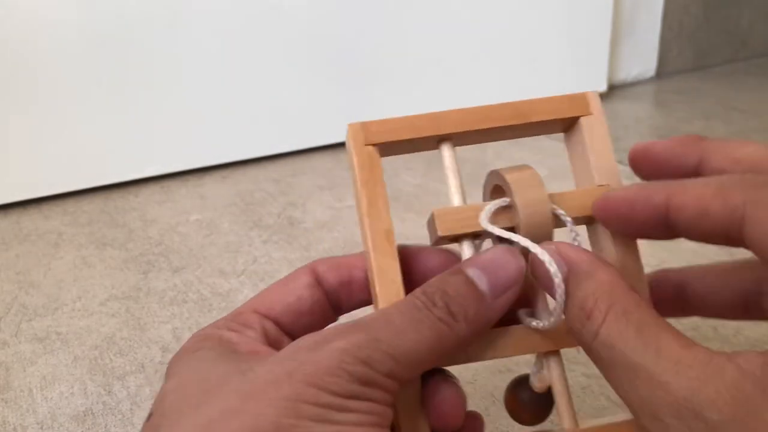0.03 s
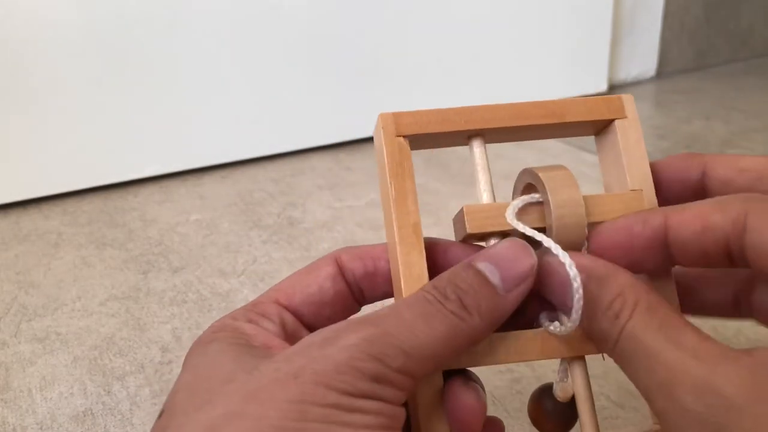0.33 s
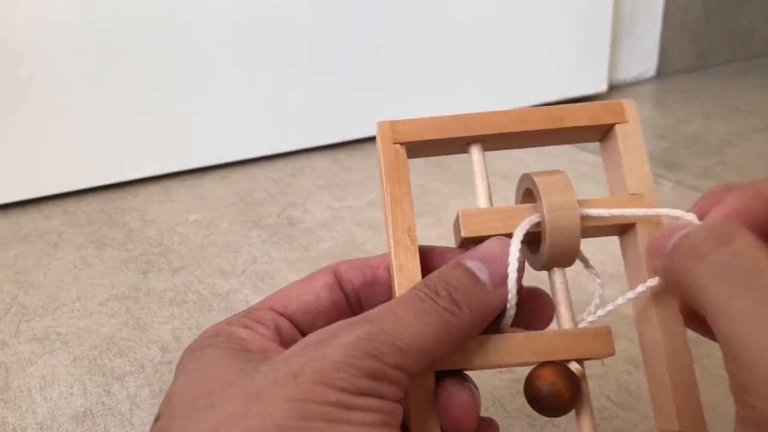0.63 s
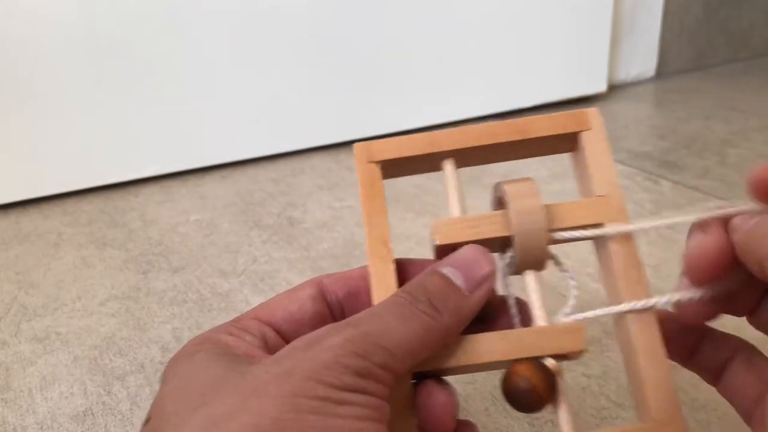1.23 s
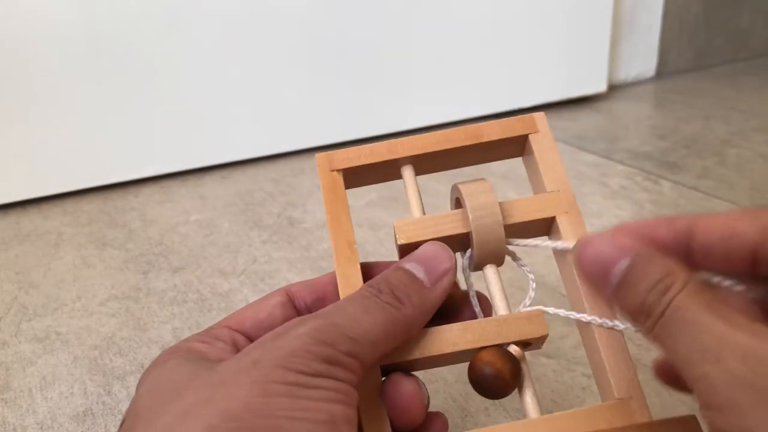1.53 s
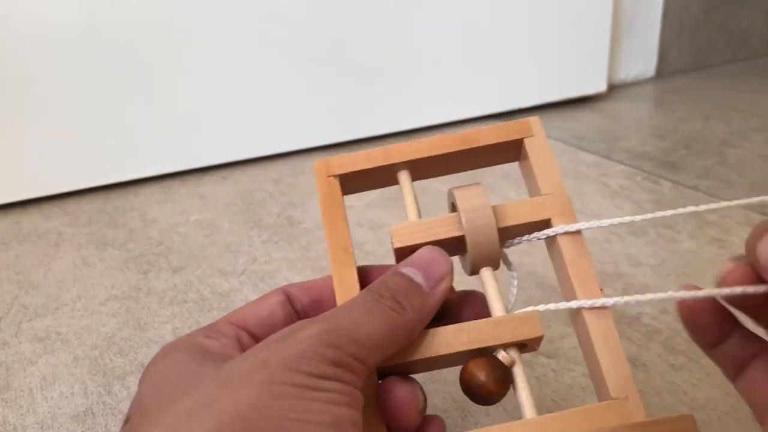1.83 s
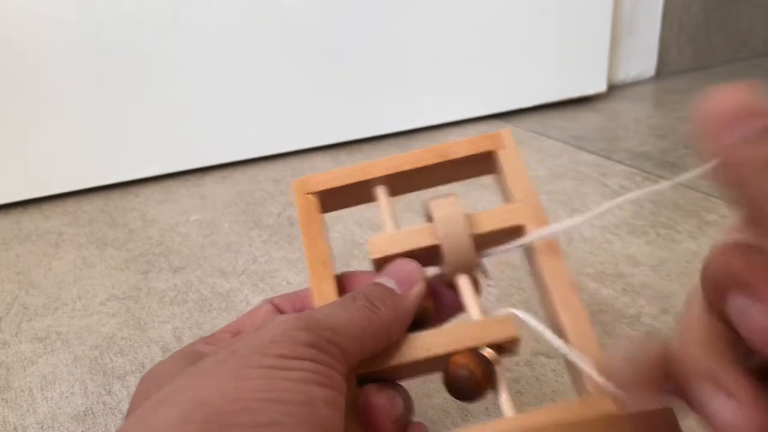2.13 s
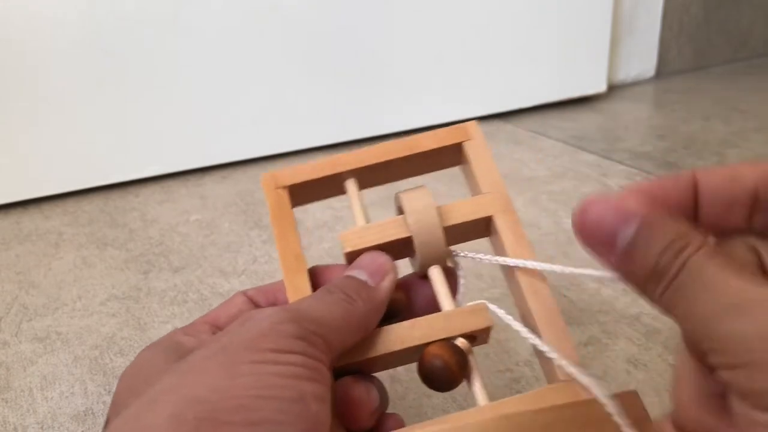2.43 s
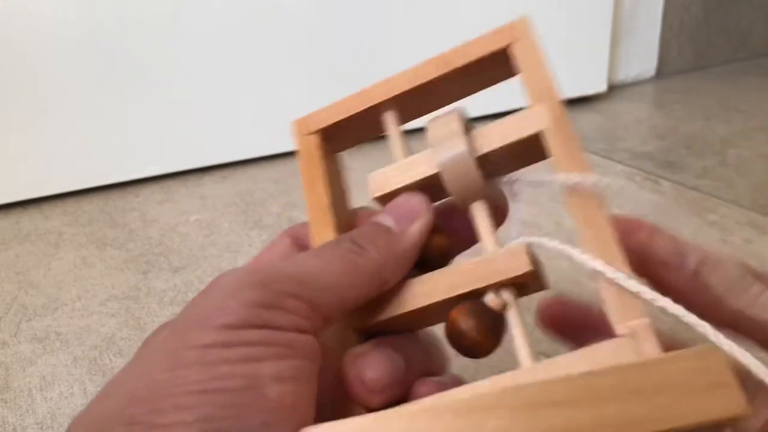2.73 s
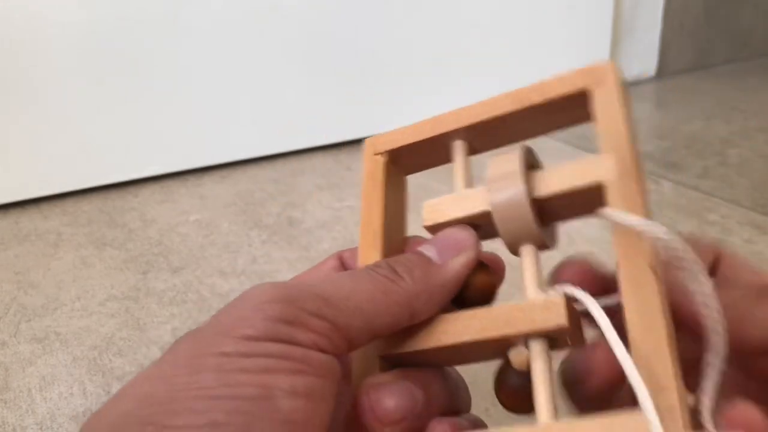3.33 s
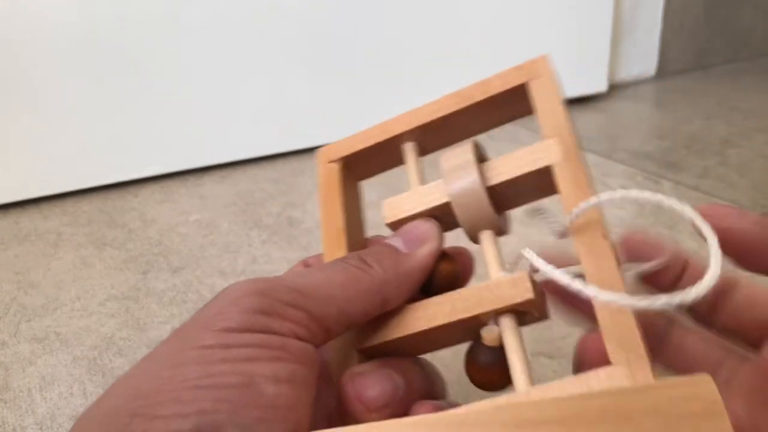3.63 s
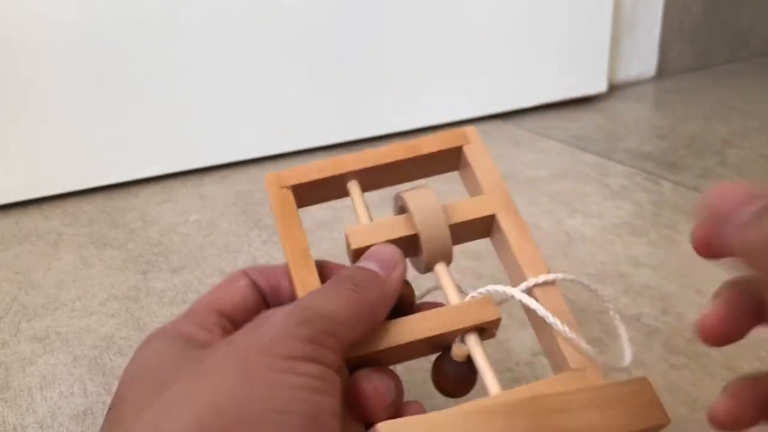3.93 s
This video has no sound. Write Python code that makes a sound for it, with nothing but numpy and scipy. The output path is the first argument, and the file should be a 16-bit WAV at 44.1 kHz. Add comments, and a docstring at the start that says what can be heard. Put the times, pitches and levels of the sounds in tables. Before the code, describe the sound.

A wooden string puzzle is handled close to the microphone in a small quiet room. Beads and a ring click against rods while a cord rustles through in short pulls. The frame knocks now and then, loudest at the end.

```python
"""In a small quiet room, a wooden string puzzle is worked by hand, close by.
A cotton cord rubs through the wood in short rustling pulls and groans once when taut.
Beads and a ring click against the rods, and the frame takes a few hollow knocks.
Under it all lie the dull rumble of the hands, a faint hum and the room's air."""
import sys
import numpy as np
from scipy import signal
from scipy.fft import rfft, irfft
from scipy.io import wavfile

SR = 44100
rng = np.random.default_rng(int(sys.argv[2]) if len(sys.argv) > 2 else 0)


def persist_wave(psi):
    """Save psi, clipped to +-1, as 16-bit WAV."""
    counts = np.round(np.clip(psi, -1, 1) * 32767).astype(np.int16)
    wavfile.write(sys.argv[1], SR, np.atleast_2d(counts).T)


N = 176400
TIME = np.arange(N) / SR
HIT = TIME[:SR // 2]  # the half-second clock of one hit
ATTACK = 176  # samples: a hit's level is set over its first 4 ms
CONTACT_RISE_S, CRACK_FADE_S, HOLLOW_FADE_S = 0.00044, 0.02, 0.022
CUTOFF_HZ = 15850

# the tones the rods ring with: pitch_hz, level_db, fade_s
ROD_TONES = [(2772, 1.5, 0.024), (3120, -7.5, 0.017), (3675, 3, 0.012), (4190, -3, .012),
             (5150, 5.5, 0.0095), (7600, -11.5, 0.013), (8320, -12, 0.024)]
# the tone colour of a sharp crack: pitch_hz, level_db
CRACK_COLOUR = [(1500, -14.5), (4500, -2.5), (6200, -4), (8300, 0), (10000, -10), (16000, -14.5)]
# the tone colour of hollow wood: pitch_hz, level_db
HOLLOW_COLOUR = [(250, -8.5), (550, -15), (900, -4), (1350, -6), (1900, -10.5), (5000, -32)]
# knocks on the frame: start_s, wood_db, crack_db, thump_db, boom_db
FRAME_KNOCKS = [(0.2611, -38.5, -42.5, -49.5, -40), (0.7036, -41.5, -44.5, -46, -47.5),
                (0.7776, -33.5, -39.5, -42.5, -43.5), (.797, -49, -54, -44, -53),
                (2.029, -58.5, -77, -58.5, -56), (2.177, -56, -61, -52, -61), (2.22, -59, -59, -49, -51.5),
                (3.713, -74, -95, -55, -49.5), (3.988, -22.5, -31.5, -33, -48.5)]


def amp(db):
    """Turn decibels into a gain."""
    return 10 ** (np.asarray(db) / 20)


def unit(x, size=None):
    """Scale to an average (rms) level of 1 over the first samples, or over all."""
    return x / np.sqrt(np.mean(x[:size] ** 2) + 1e-20)


def at_hz(points, hz):
    """Read between a table's rows, with octaves evenly spaced."""
    pitches, values = np.transpose(points)
    return np.interp(np.log(np.maximum(hz, 1)), np.log(pitches), values)


def colour(x, points):
    """Turn each pitch of a sound up or down as a table says."""
    hz = np.fft.rfftfreq(len(x), 1 / SR)
    return irfft(rfft(x) * amp(at_hz(points, hz)), len(x))


def noise(points, size):
    """Noise with a given tone colour."""
    return unit(colour(rng.standard_normal(size), points))


def narrow(hz, width_hz, size):
    """Noise around one pitch; around 0 Hz it is a random wobble."""
    distance = 2 * (np.fft.rfftfreq(size, 1 / SR) - hz) / width_hz
    return unit(irfft(rfft(rng.standard_normal(size)) / (1 + distance ** 2), size))


def fade(fade_s):
    """Die away by 60 dB in fade_s seconds."""
    return amp(-60 * HIT / fade_s)


def swell(peak_s, rise_s, fall_s):
    """A rounded rise and fall around a moment."""
    return np.exp(-((TIME - peak_s) / np.where(TIME < peak_s, rise_s, fall_s)) ** 2)


def build_up(rise_s):
    """Wood gives a little, so a blow takes a moment to build."""
    return 1 - np.exp(-HIT / rise_s)


def struck(tones, tuning=1):
    """A struck object rings with fading tones, their strengths new at every blow."""
    out = np.zeros(len(HIT))
    for k, (hz, db, fade_s) in enumerate(tones):
        strength = (-1) ** k * amp(db + 2.5 * rng.uniform(-1, 1))
        out += strength * np.sin(2 * np.pi * hz * tuning * HIT) * fade(fade_s)
    return out


def burst(points, fade_s):
    """The short noisy part of a hit."""
    return unit(noise(points, len(HIT)) * fade(fade_s), ATTACK)


def add(out, start_s, x):
    """Mix a sound in at a given time."""
    i = int(np.clip(start_s * SR, 0, N - 1))
    out[i:i + len(x)] += x[:N - i]


def background():
    """Hands rumble on the frame, over a wavering hum and the room's air."""
    # how loud the hands are: time_s, level_db
    hand_levels = [(0, -49), (.2, -56.5), (.68, -57.5), (.84, -46.5), (1.0, -57.5), (1.9, -61.5),
                   (2.12, -64), (2.25, -53.5), (2.45, -63), (4.0, -64.5)]
    # the tone colour of the hands: pitch_hz, level_db
    rumble_colour = [(35, -17.5), (65, -0.5), (145, 0.5), (300, -4.5), (1500, -44)]
    # the tone colour of the air: pitch_hz, level_db
    air_colour = [(18, -55), (30, 1.5), (149, -17.5), (616, -11), (16000, -25.5)]
    rumble = amp(np.interp(TIME, *np.transpose(hand_levels))) * noise(rumble_colour, N)
    hum = amp(-64) * narrow(hz=151.4, width_hz=15.3, size=N)
    return rumble + hum + amp(-71.5) * noise(air_colour, N)


def friction():
    """Fibres make tiny slips over a smooth rub, catching and letting go."""
    slips_per_s, spread_db, catch_db, catch_hz = 1500, 4.5, 2.5, 70
    slipping = rng.random(N) < slips_per_s / SR
    strength = amp(spread_db * np.minimum(rng.exponential(1, N), 4))
    slips = unit(slipping * strength * rng.choice([-1, 1], N))
    smooth = 0.64 * rng.standard_normal(N)
    return unit((slips + smooth) * amp(catch_db * narrow(0, 2 * catch_hz, N)))


def cord_turning(x):
    """Narrow bands of pitch swell and sink on their own as the twisted cord turns over the wood."""
    drift_hz, swing_db = 14, 2.6
    edges_hz = np.geomspace(1500, 17000, 25)
    band = np.digitize(np.fft.rfftfreq(N, 1 / SR), edges_hz)
    steps_s = np.linspace(0, N / SR, int(2 * drift_hz * N / SR))
    spectrum, out = rfft(x), np.zeros(N)
    for k in range(len(edges_hz)):
        drift = np.interp(TIME, steps_s, rng.standard_normal(len(steps_s)))
        out += irfft(spectrum * (band == k), N) * amp(swing_db * drift)
    return out


def cord_pulls():
    """Each pull hisses, rubs the rods and the frame into sound, and now and then rasps."""
    # pulls of the cord: peak_s, rise_s, fall_s, hiss_db, rods_db, hollow_db
    pulls = [(0.171, .15, 0.013, -73, -64.5, -65), (.46, 0.032, 0.074, -70, -68.5, -74),
             (0.578, 0.042, 0.027, -62.5, -62, -62), (.768, 0.064, 0.032, -63, -59.5, -57),
             (.86, 0.066, 0.39, -69.5, -73.5, -71), (1.127, 0.024, 0.053, -56.5, -62, -72.5),
             (1.245, 0.008, 0.025, -55, -54, -61.5), (1.386, 0.039, 0.022, -62.5, -66.5, -71.5),
             (1.785, 0.11, 0.032, -60.5, -69, -68.5), (2.03, 0.08, 0.068, -64, -66.5, -66),
             (2.201, 0.036, 0.1, -63, -63.5, -63.5), (2.598, 0.02, 0.0043, -55, -60, -62),
             (2.765, 0.075, 0.043, -61, -65.5, -76), (3.315, 0.036, 0.031, -58.5, -60, -61.5),
             (3.403, 0.046, 0.059, -60, -59.5, -68), (3.633, 0.019, 0.034, -64, -71, -78)]
    # the tone colour of the fibres' hiss: pitch_hz, level_db
    fibre_colour = [(1500, -19), (5000, -2), (6300, 2.5), (8400, 2), (10000, -3), (16000, -8)]
    # the rub catches and rasps; in the row at 3.9 s the cord slides with a smooth high hiss:
    # peak_s, half_length_s, pitch_hz, level_db, width (share of the pitch)
    catches = [(0.768, 0.015, 5430, -51, .06), (1.141, 0.034, 8450, -55.5, .1),
               (1.243, 0.021, 8650, -54.5, .06), (1.247, .008, 2760, -48, 0.036),
               (3.317, 0.0046, 4310, -49, 0.11), (3.315, 0.014, 1850, -49, .5),
               (3.312, 0.019, 7750, -56.5, 0.12), (3.9, 0.085, 9300, -66, 0.85)]
    rough_db, rough_hz = 3, 300
    power = sum(np.outer(amp(levels_db), swell(peak_s, rise_s, fall_s)) ** 2
                for peak_s, rise_s, fall_s, *levels_db in pulls)
    hiss_gain, rods_gain, hollow_gain = np.sqrt(power)
    rub = friction()
    rasps = sum(amp(db) * swell(peak_s, half_s, half_s) * narrow(hz, width * hz, N)
                for peak_s, half_s, hz, db, width in catches)
    roughness = unit(amp(rough_db * narrow(0, 2 * rough_hz, N)))
    hiss = hiss_gain * unit(colour(rub, fibre_colour))
    rods = rods_gain * unit(signal.fftconvolve(rub, struck(ROD_TONES))[:N])
    rustle = cord_turning(hiss + rods)
    hollow = hollow_gain * unit(colour(friction(), HOLLOW_COLOUR))
    return rustle + hollow + roughness * rasps


def rod_tap():
    """The rods ring a little higher or lower with every change of grip."""
    return unit(struck(ROD_TONES, tuning=1 + 0.05 * rng.uniform(-1, 1)), ATTACK)


def clicks():
    """A bead or the ring hits the rods: both ring, with a crack and a light clack of the frame."""
    # the hits: start_s, piece_db, pitch_hz, rods_db, clack_db, crack_db
    hits = [(0.1957, -56, 2420, -54, -52, -50.5), (0.5595, -47, 4400, -51, -54, -49.5),
            (0.591, -40.5, 4800, -45.5, -36.5, -45), (0.6038, -42, 4460, -47, -41, -60),
            (1.1448, -52, 8250, -55, -60, -45.5), (1.2214, -52, 5510, -58, -56.5, -50),
            (1.514, -72, 2820, -75, -64, -55.5), (1.6509, -65, 5200, -64, -63, -52),
            (1.696, -42, 2910, -44.5, -68, -43.5), (1.758, -54, 5120, -50.5, -66, -45),
            (1.7898, -48, 2660, -47.5, -46.5, -44), (2.002, -38, 2800, -36, -68, -37),
            (2.518, -38, 4310, -53.5, -53.5, -41), (2.706, -57, 4960, -58, -61, -53.5),
            (2.7718, -56, 4930, -59, -50, -49), (2.9128, -36.5, 3193, -42.5, -45.5, -41),
            (3.057, -58.5, 3850, -59.5, -70, -53.5), (3.3593, -50, 2900, -54, -70, -45),
            (3.4028, -54, 5320, -55, -48, -45.5)]
    # a loose piece shivers on after its click: start_s, pitch_hz, level_db
    shivers = [(.604, 4300, -56.5), (0.605, 7840, -61), (.604, 1450, -58.5), (2.915, 3210, -52.5),
               (2.913, 5330, -56), (2.912, 7400, -58)]
    piece_fade_s = 0.02
    out = np.zeros(N)
    cut_bass = signal.butter(2, 1110, "high", fs=SR, output="sos")
    for start_s, piece_db, hz, rods_db, clack_db, crack_db in hits:
        piece_tones = [(hz, 0, piece_fade_s), (0.86 * hz, -3.5, piece_fade_s / 2)]
        piece = amp(piece_db) * unit(struck(piece_tones), ATTACK)
        hollow = burst(HOLLOW_COLOUR, HOLLOW_FADE_S)
        clack = amp(clack_db) * unit(signal.sosfilt(cut_bass, hollow), ATTACK)
        rods = amp(rods_db) * rod_tap()
        crack = amp(crack_db) * burst(CRACK_COLOUR, CRACK_FADE_S)
        add(out, start_s, build_up(CONTACT_RISE_S) * (piece + rods + crack + clack))
    for start_s, hz, db in shivers:
        shiver = narrow(hz, 0.1 * hz, len(HIT)) * fade(0.17)
        add(out, start_s, amp(db) * unit(shiver, size=1300))
    return out


def touches():
    """Pieces graze the rods just before a knock, and tick faintly as the hands shift."""
    ticks_per_s = 5
    graze = sum(amp(min(-46.5, wood_db - 15.5)) * swell(knock_s, 0.0072, CONTACT_RISE_S)
                for knock_s, wood_db, *_ in FRAME_KNOCKS)
    out = graze * unit(signal.fftconvolve(friction(), struck(ROD_TONES))[:N])
    for when, softness in rng.random((int(ticks_per_s * N / SR), 2)):
        tick = rod_tap() + burst(CRACK_COLOUR, CRACK_FADE_S) / 2
        add(out, when * N / SR, amp(-64 - 10 * softness) * build_up(CONTACT_RISE_S) * tick)
    return out


def knocks():
    """The frame gives a dull crack, brighter when hit harder; a low thump and boom build up after it."""
    # the frame's own tones: pitch_hz, level_db, fade_s
    frame_tones = [(732, -7.5, 0.059), (906, 2.5, 0.019), (1019, 4.5, 0.02), (1218, -2.5, 0.029),
                   (1387, -1, 0.024)]
    # the low tones a knock wakes: pitch_hz, level_db, fade_s
    thump_tones = [(265.5, -4.5, 0.18), (295.9, 3, 0.29), (333.3, -7.5, 0.51), (392, -11, 0.48),
                   (439.5, -5.5, 0.18), (490, 2.5, 0.047)]
    # the deepest tones: pitch_hz, level_db, fade_s
    boom_tones = [(130, 5.5, .15), (144.6, 5, 0.27), (179.6, -8.5, 0.44)]
    out = np.zeros(N)
    usual_db = np.median([wood_db for _, wood_db, *_ in FRAME_KNOCKS])
    for start_s, wood_db, crack_db, thump_db, boom_db in FRAME_KNOCKS:
        octaves_up = max(wood_db - usual_db, 0) / 14
        cut_treble = signal.butter(2, min(7500 * 2 ** octaves_up, CUTOFF_HZ), fs=SR, output="sos")
        wood = unit(struck(frame_tones), ATTACK) + burst(HOLLOW_COLOUR, HOLLOW_FADE_S) / 2
        crack = rod_tap() + amp(-3.5) * burst(CRACK_COLOUR, CRACK_FADE_S)
        blow = signal.sosfilt(cut_treble, amp(wood_db) * wood + amp(crack_db) * crack)
        thump = amp(thump_db) * unit(struck(thump_tones) * build_up(0.0012), size=1300)
        boom = amp(boom_db) * unit(struck(boom_tones) * build_up(0.0073), size=2200)
        add(out, start_s, build_up(CONTACT_RISE_S) * blow + thump + boom)
    return out


def cord_groan():
    """The taut cord sticks and slips at a low, wavering pitch."""
    # the one groan: peak_s, rise_s, fall_s, pitch_hz, level_db
    groan = (1.378, .032, .048, 288, -48)
    peak_s, rise_s, fall_s, hz, db = groan
    wavering_hz = hz * (1 + 0.025 * narrow(0, 83, N))
    phase = 2 * np.pi * np.cumsum(wavering_hz) / SR
    tone = np.sqrt(2) * (np.sin(phase) + amp(-27) * np.sin(2 * phase))
    return amp(db) * swell(peak_s, rise_s, fall_s) * tone


def room(x):
    """The walls send back a blur of echoes whose treble dies first."""
    # how long the echoes last: pitch_hz, fade_s
    echo_fades = [(300, 0.68), (2000, 0.51)]
    # their tone colour: pitch_hz, level_db
    echo_colour = [(150, -3.5), (400, 3), (3000, -5), (15000, -3.5)]
    delay_s = 0.0028
    edges_hz = np.geomspace(80, 18000, 9)
    tail = np.zeros(len(HIT))
    for low, high in zip(edges_hz, edges_hz[1:]):
        band = signal.butter(2, [low, high], "band", fs=SR, output="sos")
        fade_s = at_hz(echo_fades, np.sqrt(low * high))
        tail += signal.sosfilt(band, rng.standard_normal(len(HIT))) * fade(fade_s)
    tail = colour(tail / np.sqrt(np.sum(tail ** 2)), echo_colour)
    tail *= np.clip(HIT / delay_s - 1, 0, 1) * (1 - HIT / HIT[-1])  # start late, end in silence
    return amp(-6) * signal.fftconvolve(x, tail)[:N]


def scene():
    """The puzzle close by, with its room, in one channel."""
    puzzle = clicks() + knocks() + touches() + cord_pulls() + cord_groan()
    return (puzzle + room(puzzle) + background())[None]


def record(dry):
    """The very highest treble is cut steeply."""
    return signal.sosfilt(signal.ellip(10, .1, 70, CUTOFF_HZ, fs=SR, output="sos"), dry)


dry = scene()
out = record(dry)
persist_wave(out)
```